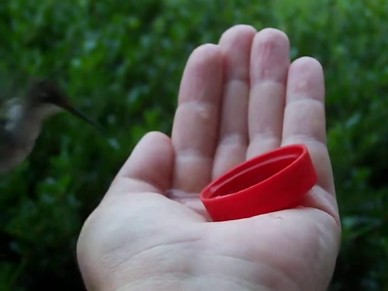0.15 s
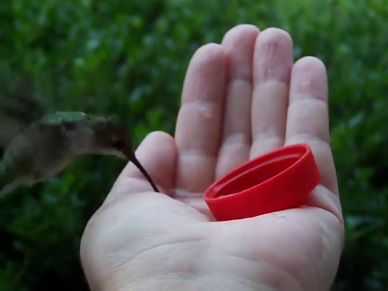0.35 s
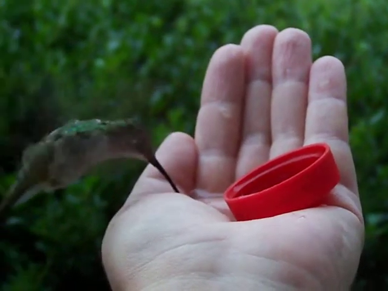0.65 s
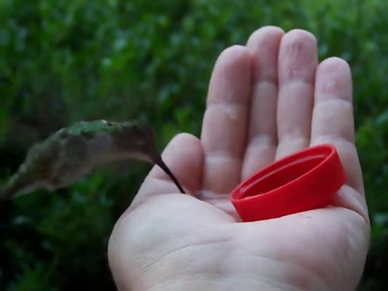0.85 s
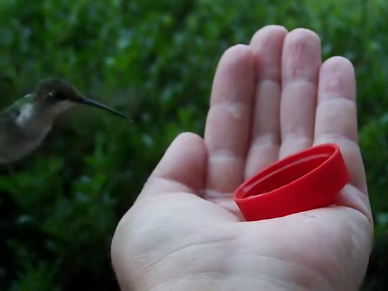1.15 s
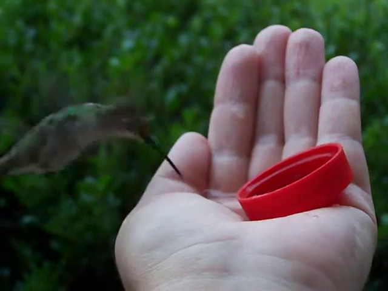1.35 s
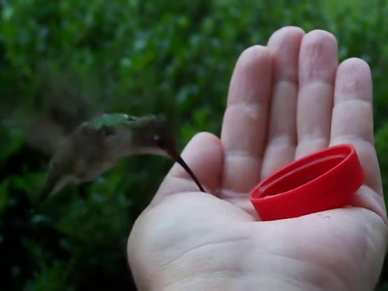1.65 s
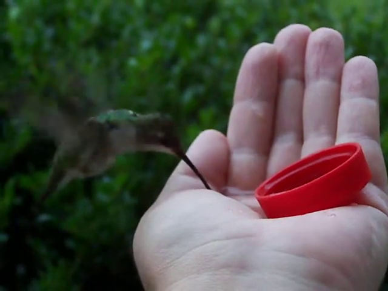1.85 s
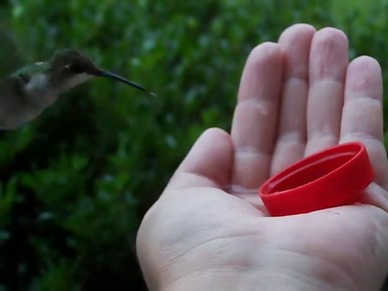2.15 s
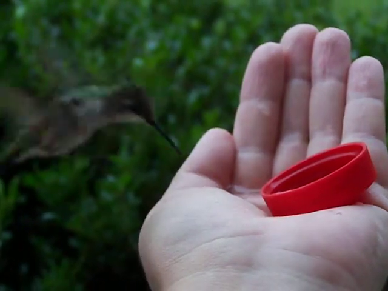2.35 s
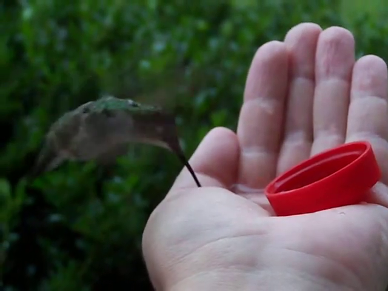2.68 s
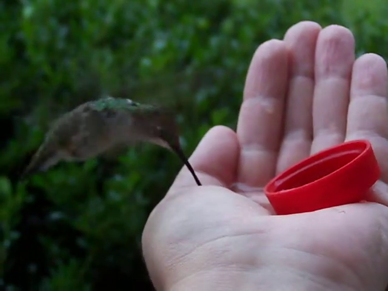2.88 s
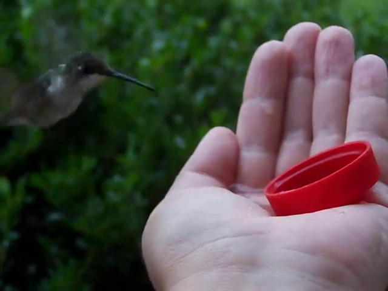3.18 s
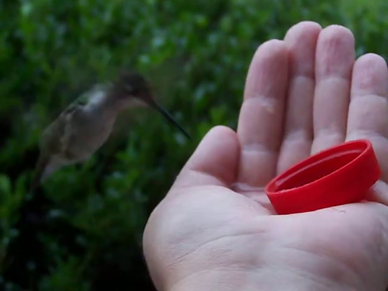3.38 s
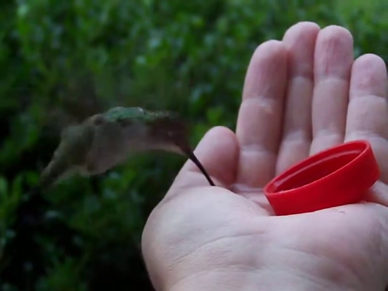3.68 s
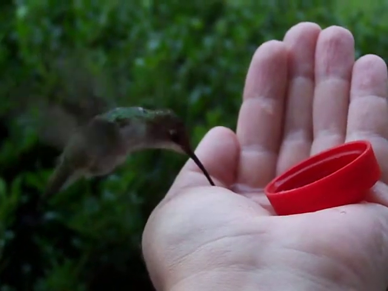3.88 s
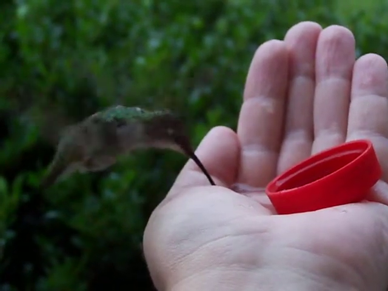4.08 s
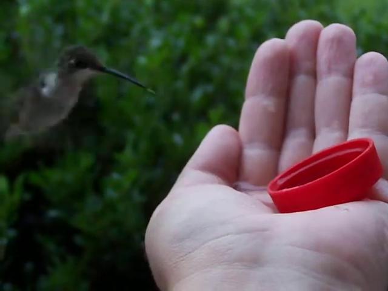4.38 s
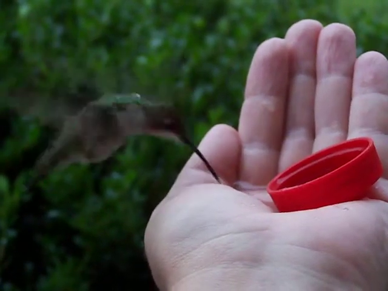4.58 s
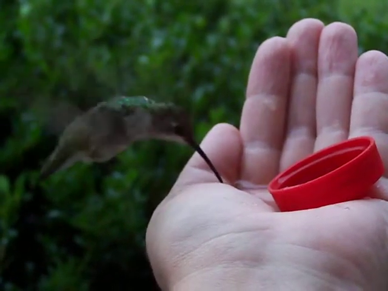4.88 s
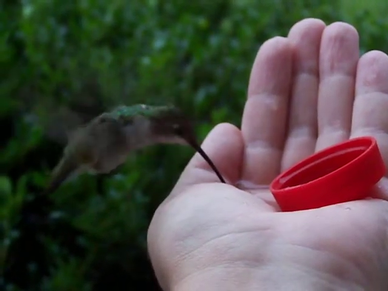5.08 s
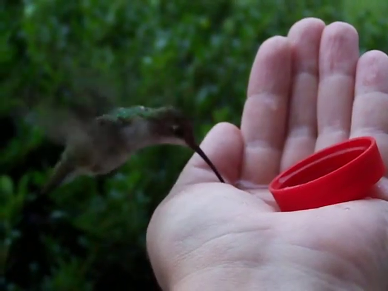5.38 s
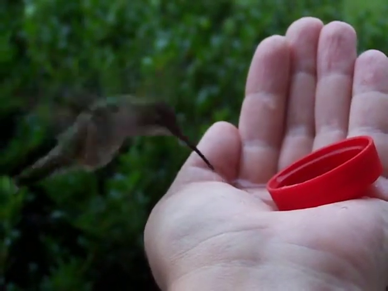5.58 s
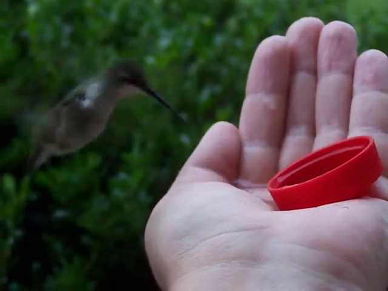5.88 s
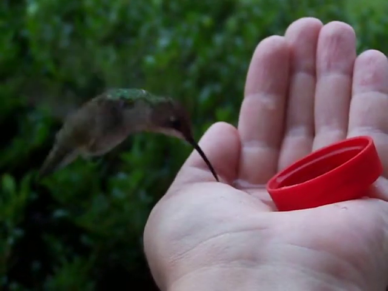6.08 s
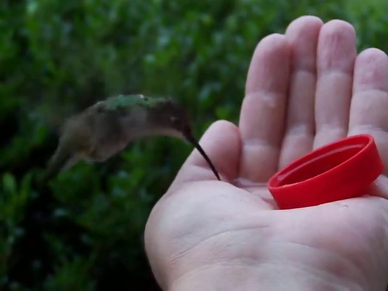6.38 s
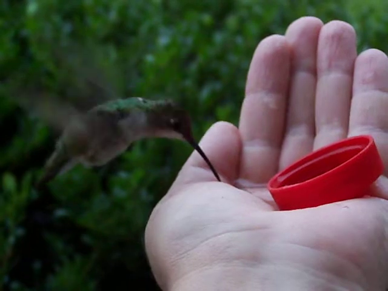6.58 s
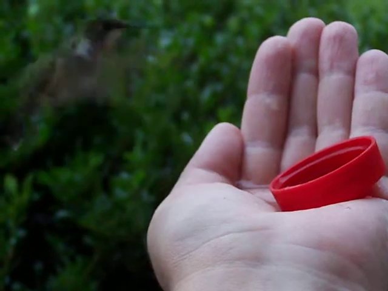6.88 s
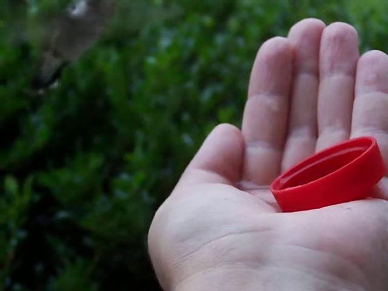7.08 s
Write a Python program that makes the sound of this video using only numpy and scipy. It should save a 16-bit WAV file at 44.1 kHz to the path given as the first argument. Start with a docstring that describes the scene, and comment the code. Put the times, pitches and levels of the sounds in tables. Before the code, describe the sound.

Soft, low wingbeat hum of a hummingbird close by, swelling and dipping as it darts, with insects droning faintly behind.

```python
"""In a hushed garden, a hummingbird hovers a hand's width from the microphone, sipping from a palm,
backing off upright and darting in again, then fading as it leaves. Every wingbeat pushes the air into
a hum, sheds low puffs and draws a short whistle and a rasp from the feathers on both strokes.
Hard braking strokes thump the air. A few dry ticks sound, and far insects drone thinly behind it all."""
import sys
import numpy as np
from scipy import signal
from scipy.fft import rfft, irfft, next_fast_len
from scipy.io import wavfile

SR = 44100
rng = np.random.default_rng(int(sys.argv[2]) if len(sys.argv) > 2 else 0)


def inscribe(sig):
    """Save sig as 16-bit PCM at rate SR to the path in sys.argv[1].

    A 1-D sig is mono; a 2-D sig holds one channel per row.
    Samples are clipped to [-1, 1] before scaling.
    """
    pcm = np.round(np.clip(np.atleast_2d(sig).T, -1, 1) * 32767)
    wavfile.write(sys.argv[1], SR, pcm.astype(np.int16))


N = 319725
TIME = np.arange(N) / SR

# the bird flies off; the hum, which carries least far, fades first
LEAVES_S, HUM_FADE_DB_PER_S, FEATHER_FADE_DB_PER_S = 6.72, 10, 7


def gain_of(db):
    """Decibels to amplitude."""
    return 10 ** (np.asarray(db) / 20)


def unit_rms(x):
    """Scales to an rms of one."""
    return x / np.sqrt(np.mean(x ** 2) + 1e-20)


def equalise(x, points):
    """Filters by an EQ curve of (freq_hz, gain_db) points."""
    hz, db = np.transpose(points)
    size = next_fast_len(N + 4096)
    bins_hz = np.fft.rfftfreq(size, 1 / SR)
    curve_db = np.interp(np.log(bins_hz + 1), np.log(hz + 1), db)
    return irfft(rfft(x, size) * gain_of(curve_db), size)[:N]


def noise(colour):
    """Noise shaped by an EQ curve, rms one."""
    return unit_rms(equalise(rng.standard_normal(N), colour))


def wander(hz):
    """Smooth random modulation up to about hz, rms one."""
    bins_hz = np.fft.rfftfreq(N, 1 / SR)
    return unit_rms(irfft(rfft(rng.standard_normal(N)) / (1 + (bins_hz / hz) ** 2), N))


def fuzzy_tone(hz, width_hz):
    """A narrow band of noise riding on a pitch curve."""
    angle = 2 * np.pi * np.cumsum(hz * np.ones(N)) / SR
    return unit_rms(wander(width_hz) * np.cos(angle) + wander(width_hz) * np.sin(angle))


def swells(rows):
    """Sums bell-shaped swells (centre_s, half_length_s, heights...) into one curve per height column."""
    shapes = [np.exp(-.5 * np.minimum(((TIME - s) / half) ** 2, 100)) for s, half, *_ in rows]
    return np.transpose(rows)[2:] @ np.array(shapes)


def crossfades(starts_s, fade_s):
    """One 0-1 fader curve per start, each handing over to the next."""
    begun = [(1 + np.tanh((TIME - s) / fade_s)) / 2 for s in starts_s[1:]]
    return -np.diff([np.ones(N), *begun, np.zeros(N)], axis=0)


def flight():
    """The bird's control curves: posture, wingbeat count, effort in dB, whistle pitch, time since leaving."""
    # spells of hovering, by turns upright (backed off) and leaning in to sip:
    # start_s, thrust_db, buffet_db, whistle_db, rasp_db, pitch_hz
    spells = [(0.0, -1.5, -1, 1, 4.2, 3490.0), (0.12, 0.2, 0.9, 2, -0.4, 3524),
              (0.99, 1.1, 0.5, 1.5, 2.5, 3540), (1.3, 1, 1.5, 1.2, -0.7, 3578),
              (2.03, -2.7, -3, 1.3, 0, 3452), (2.37, 0.8, 0.7, 1.9, 0.1, 3567),
              (3.08, 1, 0.4, -2.6, 2.3, 3510), (3.399, -0.6, 1.3, -1, 1.4, 3510),
              (4.2, 0.3, 0.3, 0.4, 1, 3484), (4.55, 0.1, 1.1, 0.5, 0, 3530),
              (5.66, -1.5, -2, -1.0, 0.3, 3420.0), (5.88, 0.6, 2.3, 2.5, -0.2, 3550),
              (6.88, 0.9, 0.5, 0.2, -1, 3536)]
    # the wings hurry to brake or change course: centre_s, half_length_s, extra_beat_hz
    darts = [(0.273, 0.026, 3.37), (0.505, 0.028, 1.56), (0.942, 0.035, 2.13), (1.957, 0.053, 4.93),
             (3.021, 0.041, 1.71), (3.506, 0.024, 7.06), (3.711, 0.021, 1.77), (4.164, 0.054, 3.31),
             (4.594, 0.023, 2.8), (5.568, 0.042, 2.47), (5.91, 0.057, 0.77), (6.816, 0.065, 3.14),
             (7.075, 0.022, 6.75)]
    # surges and lulls of effort:
    # centre_s, half_length_s, lift_db, thrust_db, buffet_db, whistle_db, rasp_db
    surges = [(0.152, 0.03, 4.5, 6.5, 7, 5.5, 3), (0.259, 0.033, -1, -10, -4.1, 0.5, -2.5),
              (0.499, 0.019, 2.7, 3, 2, 4.5, 3), (0.694, 0.029, 1.9, 4.5, 2, 3.5, 1),
              (1.05, 0.029, 3, 4.5, 0, -1.5, 3.2), (1.303, 0.031, 4, 4.5, 6.5, 4.5, 5.5),
              (1.388, 0.028, -2.7, 1.8, 3.5, -5.5, 1), (1.986, 0.021, 2, 1, 4.4, 8.5, 3),
              (2.226, 0.043, -0.7, 2.7, -2, 4.5, 2.2), (2.438, 0.027, 1, -4, 2.5, 5.5, 5.5),
              (3.185, 0.03, 2.0, 1.5, -2, 8, 1.5), (3.354, 0.027, 0, 6, 4, 9.5, 3.5),
              (3.55, 0.035, 1, 2, -2, 7.5, -2), (3.71, 0.029, 2, 2, 2.2, 7, 1),
              (3.876, 0.036, 2.5, 6.5, 0.5, 2.5, -3), (4.15, 0.019, -6.0, 4.5, 5.5, 2.5, 1),
              (4.284, 0.025, 2.5, 2, 2.5, 2, 3), (4.42, 0.027, 1, 1.2, 4, 4, 4.5),
              (5.41, 0.019, 3, 2.6, 2.5, 4.5, -0.5), (5.711, 0.04, 2.5, 4.5, 2.5, 6, 5.5),
              (5.863, 0.026, 1.9, 7.0, 8.5, 7.5, 4), (6.456, 0.052, 2, 3.5, 2.4, -8, 2),
              (6.813, 0.022, -11, -0.2, 6.5, 0, 2.3), (6.956, 0.018, 7, 5.5, 6, 6, 6)]
    # base wing rate of level hovering: time_s, beat_hz
    pace = [(0.0, 50.16), (0.55, 47.44), (0.8, 50.06), (1.15, 49.77), (1.45, 49.51), (1.75, 49.34),
            (2.2, 49.32), (2.7, 49.37), (3.25, 49.67), (3.9, 48.59), (4.8, 50.08), (5.3, 50.81),
            (6.15, 49.78), (6.6, 52.06), (6.95, 47.83), (7.25, 48.04)]
    starts_s, *settings = np.transpose(spells)
    faders = crossfades(starts_s, fade_s=.02)
    upright = faders[::2].sum(0)
    *spell_db, pitch_hz = np.array(settings) @ faders
    hurry_hz, = swells(darts)
    lift_db, *surge_db = swells(surges)
    thrust_db, buffet_db, whistle_db, rasp_db = np.add(spell_db, surge_db)
    beat_hz = np.interp(TIME, *np.transpose(pace)) - 3 * upright + hurry_hz
    # hurried strokes are shallower, stir more air and whistle higher
    return dict(upright=upright, beats=np.cumsum(beat_hz) / SR + .099,
                lift_db=lift_db - .27 * hurry_hz, thrust_db=thrust_db,
                buffet_db=buffet_db + .64 * hurry_hz, rasp_db=rasp_db + .53 * hurry_hz,
                whistle_db=whistle_db, pitch_hz=pitch_hz + 14 * hurry_hz,
                gone_s=np.maximum(TIME - LEAVES_S, 0))


def stroke(bird, place, rise, fall, scatter_db):
    """One swell of random strength per wingbeat, and the offset from its crest; timing is in beats."""
    beat = np.floor(bird["beats"] - place + .5)
    offset = bird["beats"] - place - beat
    strength = gain_of(scatter_db * rng.standard_normal(N // 100))[beat.astype(int) + 2]
    width = np.where(offset < 0, rise, fall)
    return unit_rms(strength * np.exp(-.5 * (offset / width) ** 2)), offset


def hum(bird):
    """Both strokes push the air (even harmonics); the downstroke's surplus lands a little earlier (odd)."""
    # balance of the hum's partials within each band: harmonic, sipping_db, upright_db
    harmonics = [(1, -8.5, -6), (2, 2, 1), (3, -13, -14.5), (4, -11.5, -9.5), (5, -10.5, -14),
                 (6, -22, -24), (7, -21, -20.5), (8, -18, -17.5), (9, -29, -27.5), (10, -27.5, -32.5),
                 (11, -38.5, -36), (12, -45.5, -34.5)]
    upright = bird["upright"]
    both, surplus = bird["beats"] - .014, bird["beats"] + .024
    partials = []
    for k, sipping_db, upright_db in harmonics:
        wave = np.cos(2 * np.pi * k * (surplus if k % 2 else both))
        partials.append(gain_of(sipping_db + upright * (upright_db - sipping_db)) * wave)
    partials[0] *= gain_of(.67 * bird["thrust_db"])  # a harder downstroke feeds the fundamental
    low, middle, high = (unit_rms(sum(band)) for band in np.split(partials, [2, 5]))
    lift = gain_of(-50 + .3 * upright + bird["lift_db"] + .51 * wander(6.6)) * low
    thrust = gain_of(-59 + 2 * upright + bird["thrust_db"] + .55 * wander(10)) * middle
    buffet = gain_of(-65.5 + upright + bird["buffet_db"] + .6 * wander(22)) * high
    return gain_of(-HUM_FADE_DB_PER_S * bird["gone_s"]) * (lift + thrust + buffet)


def eddies(bird):
    """Each stroke sheds a puff of stirred air, stronger in a sharp turn and when the body is upright."""
    # soft, low-mid colour of the puffs: freq_hz, gain_db
    colour = [(30, -23), (100, -9.5), (200, -2.5), (300, -1.5), (380, 2.5), (500, -9), (700, -19.5),
              (1200, -33.5), (3000, -67.5)]
    down, _ = stroke(bird, place=-.0088, rise=.056, fall=.15, scatter_db=.5)
    up, _ = stroke(bird, place=.45, rise=.078, fall=.098, scatter_db=.5)
    level_db = -68 + 1.36 * bird["buffet_db"] + 1.2 * bird["upright"] - HUM_FADE_DB_PER_S * bird["gone_s"]
    return gain_of(level_db) * (down + gain_of(-8) * up) * noise(colour)


def whistle(bird):
    """Flight feathers sing briefly on each stroke, the downstroke's pitch sagging as the wing slows."""
    # weaker feather modes around the whistle: pitch_ratio, width_hz, level_db
    side_modes = [(.92, 167, -7.5), (1.0, 198.5, -2), (1.18, 167, -6)]
    # the band that the feather vanes radiate: freq_hz, gain_db
    vane_eq = [(2400, -3), (2880, -3), (3100, 0.5), (3600, -2), (3900, 0.5), (4330, -0.5), (4600, -8.5),
               (5500, -8)]
    base_db, upright = -55, bird["upright"]
    hz = bird["pitch_hz"] * (1 + .00399 * wander(14.27))
    throb_db = 1.45 * fuzzy_tone(5.8, width_hz=1.1)
    effort_db = bird["whistle_db"] + throb_db - FEATHER_FADE_DB_PER_S * bird["gone_s"]
    # upright, the downstroke sings later, shorter and over a wider glide; sipping, it rings more purely
    down, offset = stroke(bird, place=-.15 + .025 * upright, rise=.058, fall=.08 - .0081 * upright,
                          scatter_db=2.8)
    up, _ = stroke(bird, place=.25, rise=.088, fall=.15, scatter_db=3)
    glide_hz = hz * (1 - (.16 + .22 * upright) * offset)
    jitter = 1 + .01102 * wander(151)
    tone = unit_rms(np.sin(2 * np.pi * np.cumsum(glide_hz * jitter) / SR))
    flutter = sum(gain_of(db) * fuzzy_tone(hz * ratio * (1 - .56 * offset), width_hz)
                  for ratio, width_hz, db in side_modes)
    voice = unit_rms(gain_of(-1.8 * upright) * tone + flutter)
    swing = unit_rms(np.tanh(.54 * down))  # a vane swings only so far, so the swell has a flat top
    downstroke = gain_of(base_db + effort_db + upright) * swing * voice
    # the upstroke is softer and follows the effort less
    up_db = base_db - 4.5 + .73 * effort_db - 1.6 * upright
    upstroke = gain_of(up_db) * up * fuzzy_tone(hz * 1.02, width_hz=480)
    return equalise(downstroke + upstroke, vane_eq)


def rasp(bird):
    """Feather edges tear the air as the wing flips at the start of each stroke, harder in a dart."""
    # colours of the rushing air on the downstroke and the upstroke: freq_hz, gain_db
    down_colour = [(500, -13.5), (1000, -14.5), (1700, -8.5), (2400, 1.5), (2650, 5.5), (2900, -5.5),
                   (4200, 4), (4900, 1), (5900, -6), (6600, -0.5), (8000, -22.5)]
    up_colour = [(500, -8), (1100, -15), (1650, 4), (2000, -3), (2400, 4), (2900, 2.5), (4200, 2.5),
                 (4900, -4.5), (5900, -2), (6600, -3.5), (8000, -16.5)]
    down, _ = stroke(bird, place=-.2, rise=.058, fall=.2, scatter_db=2.1)
    up, _ = stroke(bird, place=.24, rise=.027, fall=.11, scatter_db=.5)
    effort_db = bird["rasp_db"] + 1.4 * wander(9) - FEATHER_FADE_DB_PER_S * bird["gone_s"]
    grain = unit_rms(gain_of(1.1 * wander(1400)))
    rush = down * noise(down_colour) + gain_of(1.5) * up * noise(up_colour)
    return gain_of(-64 - 4 * bird["upright"] + effort_db) * grain * rush


def downwash(bird):
    """Upright, each downstroke sends a rough low gust toward the microphone."""
    # bass-heavy colour of the gusts: freq_hz, gain_db
    colour = [(20, -7.5), (55, 1), (150, -3), (220, -4.5), (400, -23), (1000, -50)]
    down, _ = stroke(bird, place=.02, rise=.083, fall=.17, scatter_db=1.5)
    level_db = -61.5 + .49 * bird["thrust_db"] - HUM_FADE_DB_PER_S * bird["gone_s"]
    return bird["upright"] * gain_of(level_db) * down * noise(colour)


def garden():
    """A bed of softly stirring outdoor air, with far insects droning on two thin pitches."""
    # low rumble and faint hiss of the open air: freq_hz, gain_db
    air_colour = [(15, 2.5), (26, 0.5), (40, 0), (58, 0.5), (90, -2.5), (160, -9), (350, -20), (600, -21.5),
                  (1000, -21.5), (1300, -21.5), (2000, -22.5), (3600, -19.5), (4600, -23.5), (6600, -31),
                  (8000, -31.5)]
    air = gain_of(-54 + .95 * wander(2.8)) * noise(air_colour)
    high_insects = gain_of(-73 + 1.1 * wander(12)) * fuzzy_tone(5130, width_hz=180)
    low_insects = gain_of(-65.5) * fuzzy_tone(3620, width_hz=89)
    return air + high_insects + low_insects


def flicks(width_s):
    """A wing turned flat against the air thumps: one brief suction between two pushes."""
    # hard braking strokes: time_s, level_db
    thumps = [(1.961, -45.5), (4.143, -34.5), (4.161, -41), (5.605, -43), (6.777, -45), (6.797, -38),
              (6.815, -37), (6.853, -60), (7.047, -41)]
    out = np.zeros(N)
    for time_s, level_db in thumps:
        offset = (TIME - time_s - .001) / width_s
        out += gain_of(level_db + .5) * (offset ** 2 - 1) * np.exp(-offset ** 2 / 2)
    return out


def ticks(decay_s):
    """Tiny dry snaps of bright noise, gone in a millisecond."""
    # cues of the snaps: start_s, level_db
    snaps = [(3.496, -43), (5.2637, -40), (6.8409, -48)]
    envelope = np.zeros(N)
    for start_s, level_db in snaps:
        age_s = TIME - start_s - .001
        envelope += gain_of(level_db) * (age_s > 0) * np.exp(-abs(age_s) / decay_s)
    return envelope * noise([(1000, -4), (3000, -12), (6000, 11), (7500, 15), (8500, 11), (9200, -13)])


def scene():
    """One wing cycle drives the hum, the stirred air and the feathers, over the garden bed; mono."""
    bird = flight()
    wings = hum(bird) + eddies(bird) + whistle(bird) + rasp(bird) + downwash(bird)
    return (wings + garden() + flicks(width_s=.00079) + ticks(decay_s=.00036))[None]


def record(dry):
    """A small microphone with dull treble, then a steep high cut."""
    # the microphone's treble roll-off: freq_hz, gain_db
    mic_eq = [(0, 0.5), (6700, 0.5), (7200, -4), (7700, -14), (8300, -21.5), (9000, -25)]
    high_cut = signal.firwin(511, 8800, window=("kaiser", 9), fs=SR)
    return signal.oaconvolve(equalise(dry[0], mic_eq), high_cut, "same")[None]


dry = scene()
out = record(dry)
inscribe(out)
```